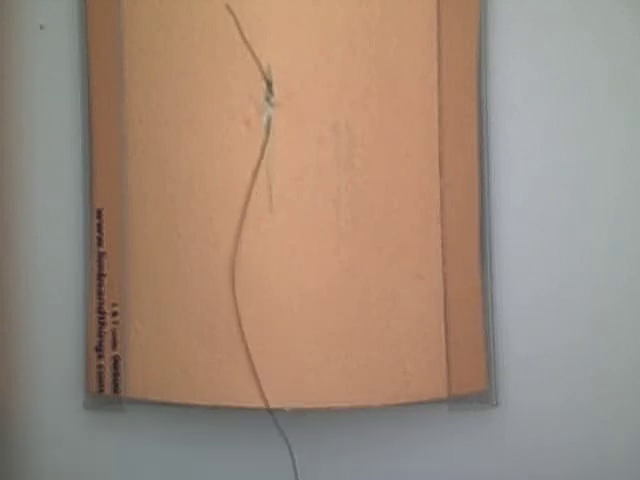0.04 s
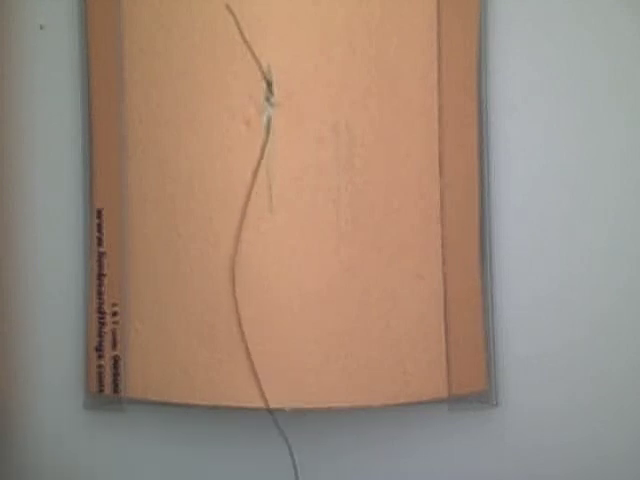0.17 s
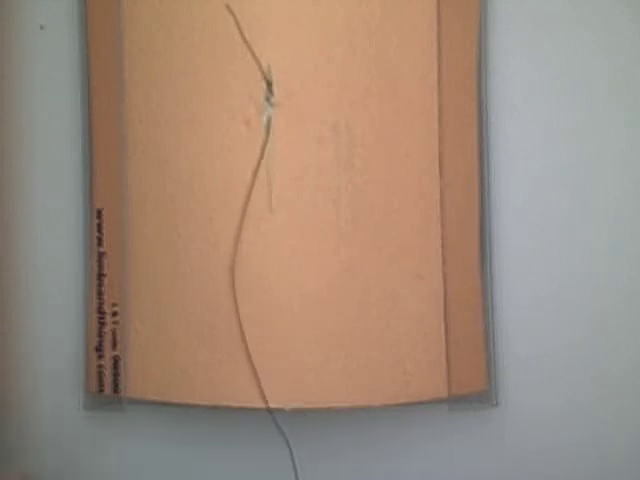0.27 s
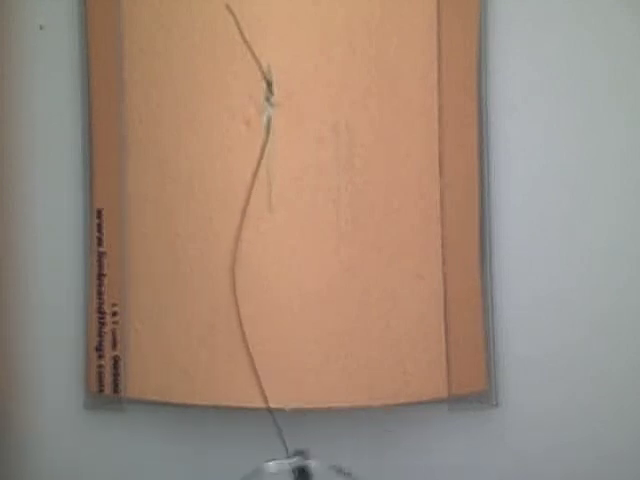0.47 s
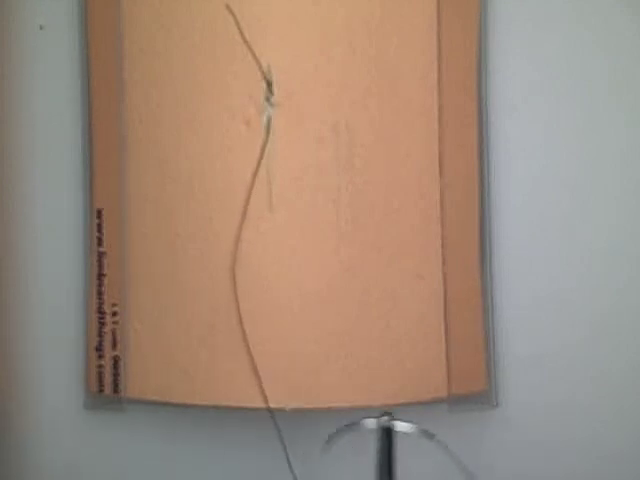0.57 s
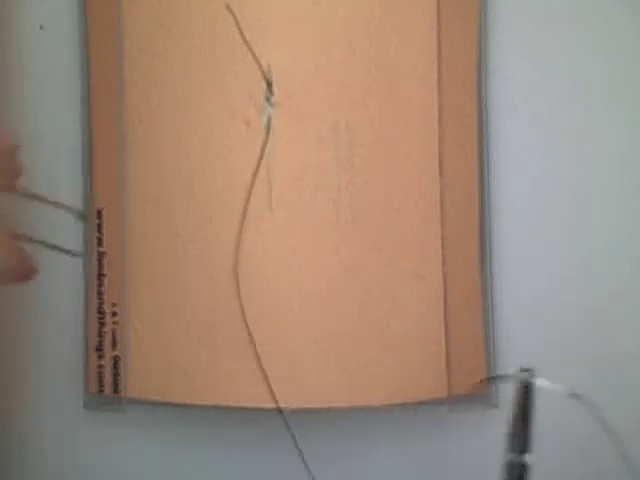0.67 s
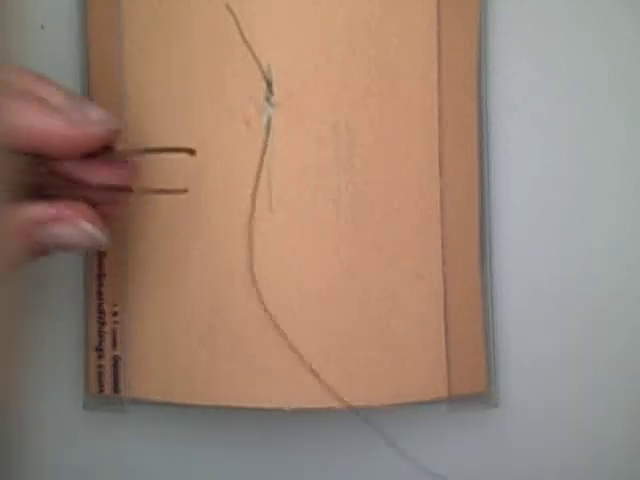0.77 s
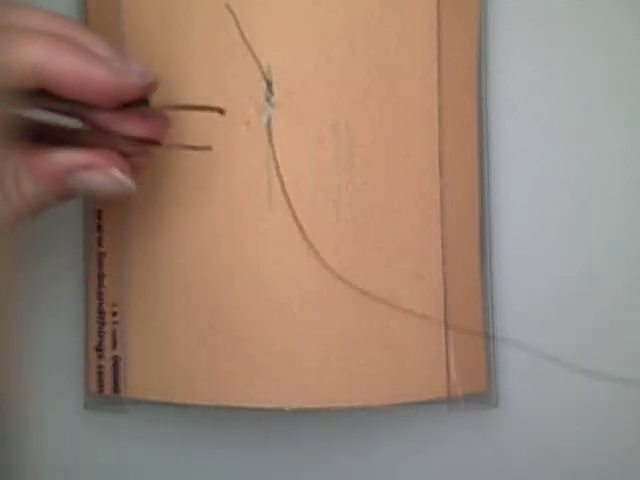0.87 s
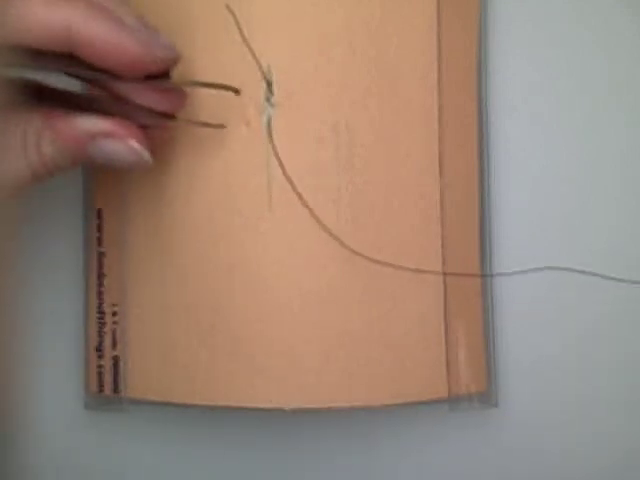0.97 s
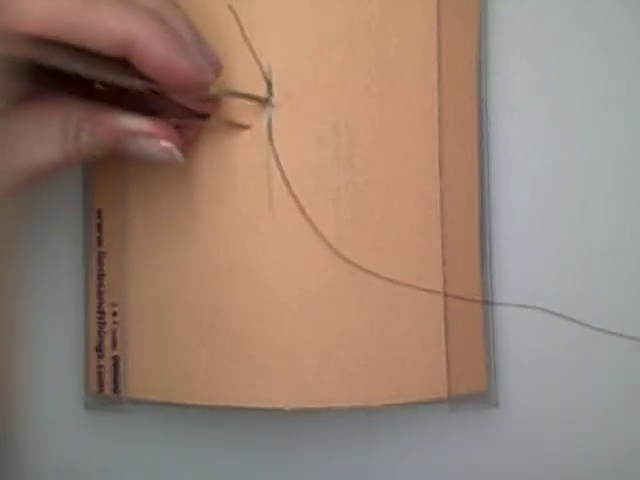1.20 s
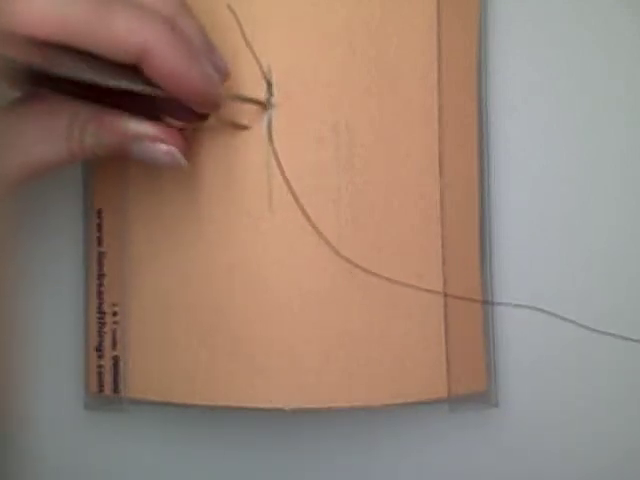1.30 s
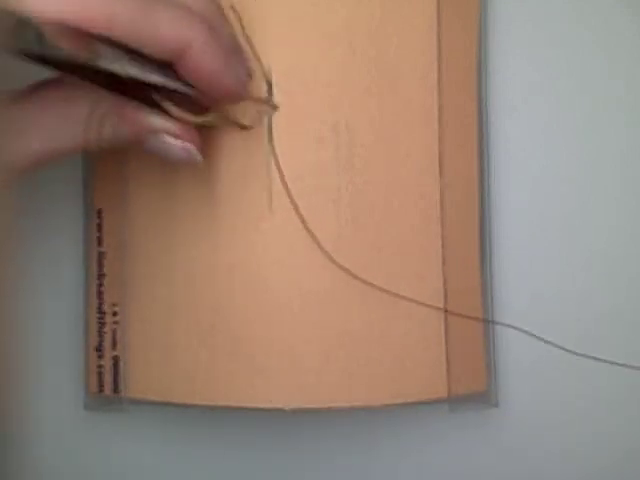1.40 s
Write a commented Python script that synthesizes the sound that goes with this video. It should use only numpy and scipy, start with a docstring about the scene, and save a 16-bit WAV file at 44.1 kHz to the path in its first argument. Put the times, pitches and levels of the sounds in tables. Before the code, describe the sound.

A steel instrument clicks once, sharply, followed by faint handling ticks over quiet hiss.

```python
"""A desk in a small room, microphone close to a suture practice pad.
A steel surgical instrument snaps once: a very brief swell of bright noise leads in, the jaws
crack together and ring for a few milliseconds, and the room answers. Faint ticks and rubs of
handling follow, over low room rumble and the recorder's hiss and thin whine."""
import sys
import numpy as np
from scipy import signal
from scipy.fft import rfft, irfft
from scipy.io import wavfile

SR = 44100
rng = np.random.default_rng(int(sys.argv[2]) if len(sys.argv) > 2 else 0)


def to_wav(s):
    """Save 16-bit WAV."""
    ch = np.atleast_2d(s).T  # columns
    pcm = np.round(np.clip(ch, -1, 1) * 32767)  # PCM
    wavfile.write(sys.argv[1], SR, pcm.astype(np.int16))


N = 63945

# colour of a bright scrape (f/Hz, relative level/dB); the table ends in a steep drop, leaving almost nothing
# above about 12.6 kHz
SCRAPE_COLOUR = [(1300, -36), (2500, -13.5), (4800, -19.5), (6150, -2.5), (7000, -7.5), (8500, -9.5),
                 (12000, -18.5), (12600, -54)]
# colour of the jaws' contact noise (f/Hz, relative level/dB)
CRACK_COLOUR = [(240, 9.5), (380, -11.5), (750, -7), (1050, -3.5), (1350, -20), (2500, -4), (4900, -13.5),
                (6400, 1.5), (9000, 6.5), (13800, 5), (15000, -5.5)]
SNAP_S, RING_GAIN_DB = .2131, 22


def jaw_snap(t):
    """Bright noise swells very briefly; at t = 0 the jaws crack together and ring as they seat."""
    swell = (t < 0) * np.exp(-abs(t) / 0.00072)
    lead_in = undb(-22.5) * swell * noise(SCRAPE_COLOUR)
    crack = undb(-33.5) * fade(t, t60=0.011) * noise(CRACK_COLOUR)
    return lead_in + crack + undb(RING_GAIN_DB) * steel_ring(t)


# modes of the hand-damped steel (f/Hz, width/Hz, relative level/dB)
STEEL_MODES = [(803.6, 412, -26.5), (1850, 256, -18), (2792, 461.0, -15.5), (3006, 204, -22.5),
               (3654, 150, -22), (4350, 373.0, -19.3), (5647, 385.0, -7), (6594, 325.0, -0.5),
               (6826, 440, 0.2), (7600, 210, -8.5), (8386, 220, -9.5), (8710, 508.0, -13),
               (10310, 362.0, -10.5), (11120, 1041, -15), (12320, 441.0, -16), (14044.0, 510, -11)]


def steel_ring(t):
    """Each mode swells within milliseconds and is choked by the grip; wide modes die first."""
    order = 4  # softness of the attack: 1 is sudden
    age = np.maximum(t, 0)
    ring = 0
    for hz, width, db in STEEL_MODES:
        damping = np.pi * width / np.sqrt(2 ** (1 / order) - 1)
        swell = age ** (order - 1) * np.exp(-damping * age)
        swell *= 2 / swell.sum()  # puts the mode's spectral peak at 1
        ring += undb(db) * swell * np.sin(2 * np.pi * hz * age)
    return ring


# reflections off surfaces near the microphone (delay t/s, level/dB relative to the direct ring)
NEAR_REFLECTIONS = [(.0073, -31), (.0085, -34), (.011, -31), (.0124, -27.5), (.016, -31)]
# colour of the room's early echo (f/Hz, relative level/dB)
EARLY_COLOUR = [(200, -15), (500, -7), (1200, -12.5), (1900, -3.5), (2300, -11.5), (3000, -2.5),
                (3600, -18), (4400, -4), (4950, -17.5), (5650, 0.5), (6700, 7), (7600, -0.5), (8200, 4),
                (9300, -5), (11200, -3), (12700, 1.5), (14200, -1), (14900, -14.5)]
# colour of its late tail (f/Hz, relative level/dB)
TAIL_COLOUR = [(500, -5.5), (1200, -13), (1900, -6), (3000, -4), (3600, -13.5), (4400, -1.5), (4950, -12),
               (5650, 0.5), (6600, 5.5), (8200, -1), (9500, -3.5), (12500, -4.5), (13300, -32.5),
               (14500, -51)]


def room_echo(t):
    """Nearby surfaces mirror the snap; the room adds dense bright echoes and a weak, duller tail."""
    mirrored = sum(undb(RING_GAIN_DB + db) * steel_ring(t - delay) for delay, db in NEAR_REFLECTIONS)
    age = t - .007  # the room answers 7 ms after the direct sound
    early = undb(-40.5) * fade(age, t60=0.1107) * noise(EARLY_COLOUR)
    tail = undb(-51.5) * fade(age, t60=0.37) * noise(TAIL_COLOUR)
    return mirrored + early + tail


# light touches of the instruments (t/s, level/dB, t60/s, ring f/Hz, width/octaves)
TOUCHES = [(0.3392, -54.5, 0.025, 6500, .25), (0.4453, -50.5, 0.015, 6000, .45),
           (0.6483, -59, 0.02, 8600, .3), (0.7544, -59, 0.026, 6100, 0.66)]
# band in which a touch rings (offset from centre/widths, relative level/dB)
TOUCH_BAND = [(-3, -30), (-.7, -6), (0, 0), (.7, -7), (1.5, -45)]


def instrument_ticks(t):
    """Each soft contact briefly rings one region of the steel's spectrum."""
    ticks = 0
    for at, db, t60, hz, octaves in TOUCHES:
        colour = [(hz * 2 ** (offset * octaves), level) for offset, level in TOUCH_BAND]
        attack = np.clip((t - at) / 0.00069, 0, 1)
        ticks += undb(db) * attack * fade(t - at, t60) * noise(colour)
    return ticks


# steel sliding lightly as it is moved (middle t/s, half length/s, level/dB)
STEEL_SLIDES = [(0.548, 0.045, -68.5), (0.603, 0.028, -69)]
# hand and thread brushing the pad (middle t/s, half length/s, level/dB)
PAD_BRUSHES = [(0.345, 0.042, -67.5), (0.638, 0.01, -63.5), (0.752, 0.01, -65), (1.139, 0.018, -61.5)]
# colour of soft brushes (f/Hz, relative level/dB); the table ends in a steep drop, leaving almost nothing above
# about 12.6 kHz
BRUSH_COLOUR = [(150, 11), (600, 4.5), (1300, -5.5), (1850, 1), (3100, -2), (3900, -7), (5500, -6.5),
                (11500, -12), (12600, -50)]


def handling_rubs(t):
    """Friction at the pad: noise that swells and dies with each stroke of steel, hand or thread."""
    rubs = 0
    for strokes, colour in (STEEL_SLIDES, SCRAPE_COLOUR), (PAD_BRUSHES, BRUSH_COLOUR):
        swells = sum(undb(db) * np.exp(-((t - at) / half) ** 2) for at, half, db in strokes)
        rubs += swells * noise(colour)
    return rubs


# room rumble at the microphone (f/Hz, relative level/dB)
RUMBLE_COLOUR = [(8, 0), (26, 2.5), (45, -4), (62, -10), (82, -6.5), (140, -6.5), (170, -10), (245, -11),
                 (400, -23.5), (560, -23), (700, -27), (1200, -34.5), (3000, -72), (12000, -100)]
# the recorder's own hiss (f/Hz, relative level/dB)
HISS_COLOUR = [(300, 2.5), (2000, 4.5), (3500, 1), (5150, -0.5), (5550, 5.5), (7300, -2), (11950, -3),
               (12450, -40), (16000, -48)]
# steady hum and whine (f/Hz, rms level/dB)
HUM_AND_WHINE = [(45, -63.5), (150.7, -69.5), (197, -70), (1265, -85), (9189, -82.5)]


def noise_floor(t):
    """Under everything: the room's rumble, a low hum, and the recorder's hiss and whine."""
    tones = 0
    for hz, db in HUM_AND_WHINE:
        tones += undb(db) * np.sqrt(2) * np.sin(2 * np.pi * (hz * t + rng.random()))
    rumble = undb(-53.5) * noise(RUMBLE_COLOUR)
    hiss = undb(-67) * noise(HISS_COLOUR)
    return rumble + hiss + tones


def undb(db):
    """Decibels to amplitude."""
    return 10 ** (np.asarray(db) / 20)


def noise(colour):
    """Noise of rms 1 with a spectrum through (f/Hz, relative level/dB) points."""
    hz, db = np.array(colour, float).T
    bin_hz = np.maximum(np.arange(N // 2 + 1) * SR / N, 1)
    gain = undb(np.interp(np.log(bin_hz), np.log(hz), db))
    coloured = irfft(rfft(rng.standard_normal(N)) * gain, N)
    return coloured / np.std(coloured)


def fade(t, t60):
    """A sudden start at t = 0, then a fall of 60 dB every t60 seconds."""
    return (t >= 0) * np.exp(-np.log(1000) * np.maximum(t, 0) / t60)


def scene():
    """One close microphone, the same in both channels."""
    t = np.arange(N) / SR
    snap = jaw_snap(t - SNAP_S) + room_echo(t - SNAP_S)
    mono = snap + instrument_ticks(t) + handling_rubs(t) + noise_floor(t)
    return np.array([mono, mono])


def record(dry):
    """The recorder cuts the top steeply above 14.9 kHz."""
    return signal.sosfilt(signal.ellip(8, .2, 80, 14900, fs=SR, output="sos"), dry)


dry = scene()
out = record(dry)
to_wav(out)
```